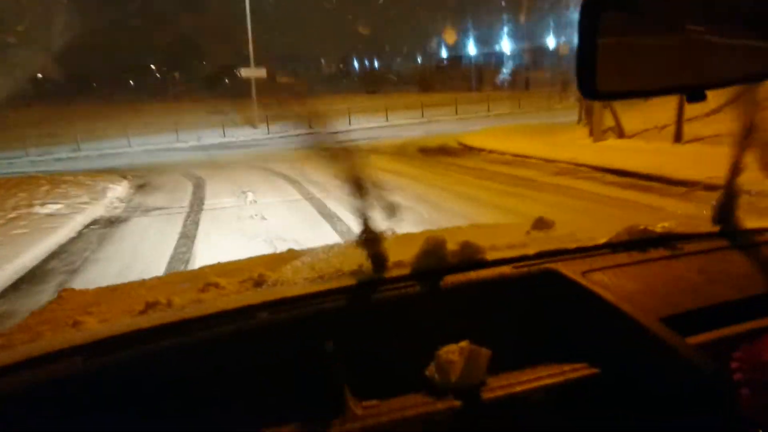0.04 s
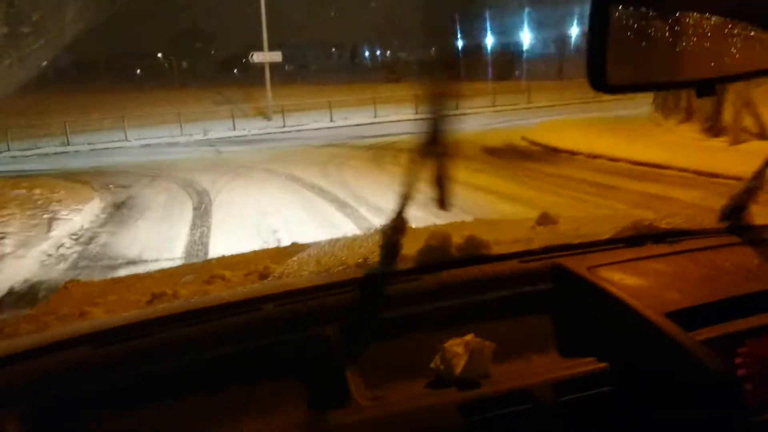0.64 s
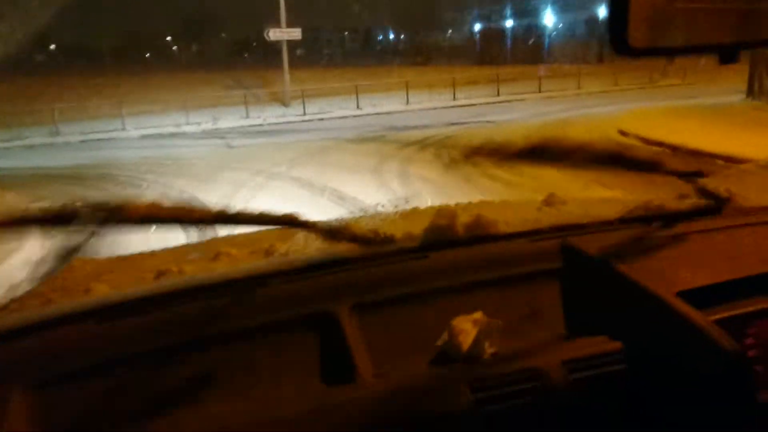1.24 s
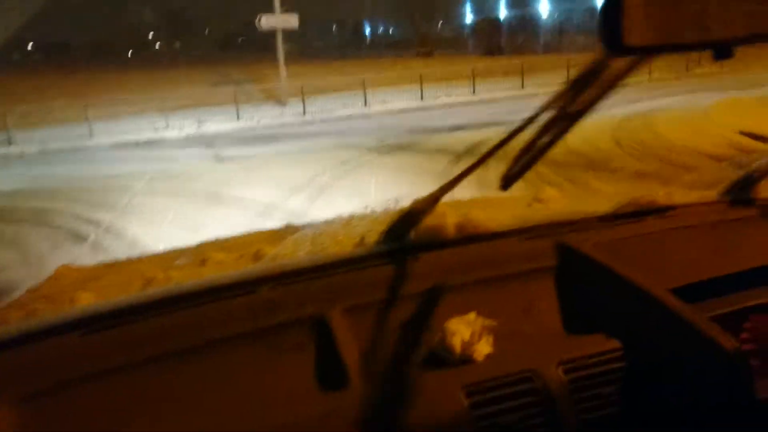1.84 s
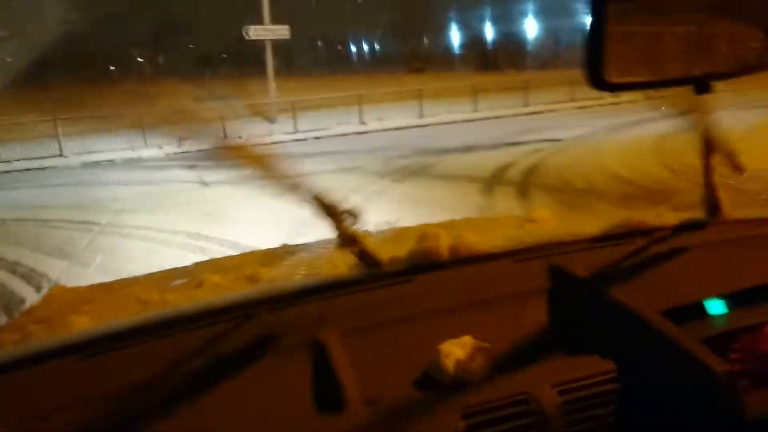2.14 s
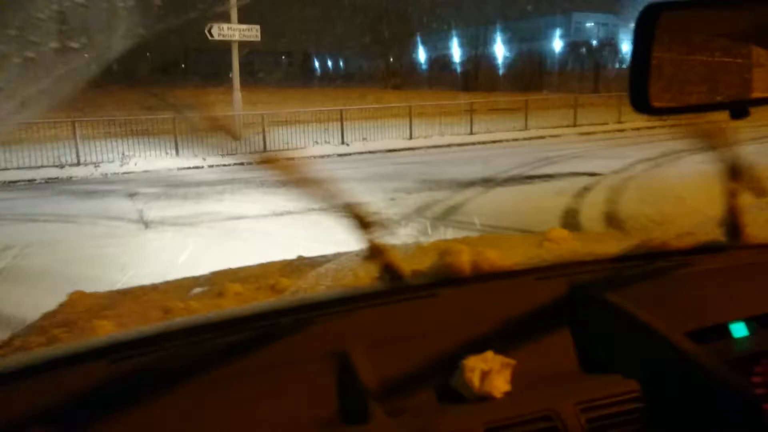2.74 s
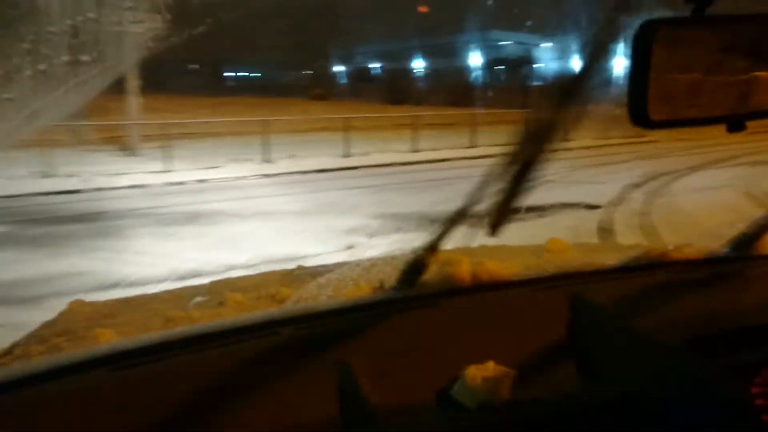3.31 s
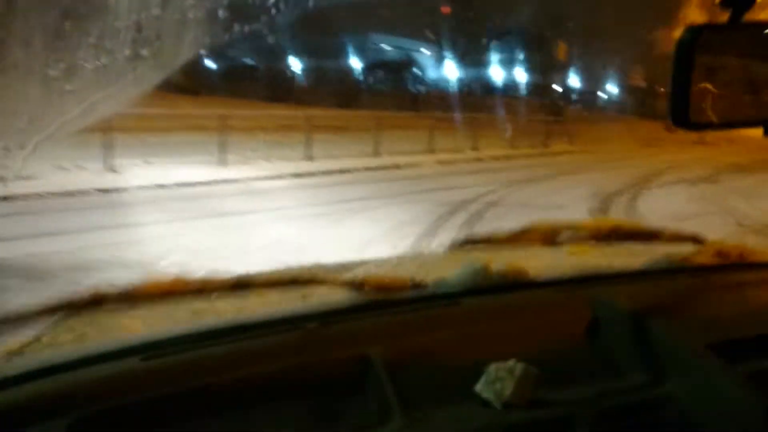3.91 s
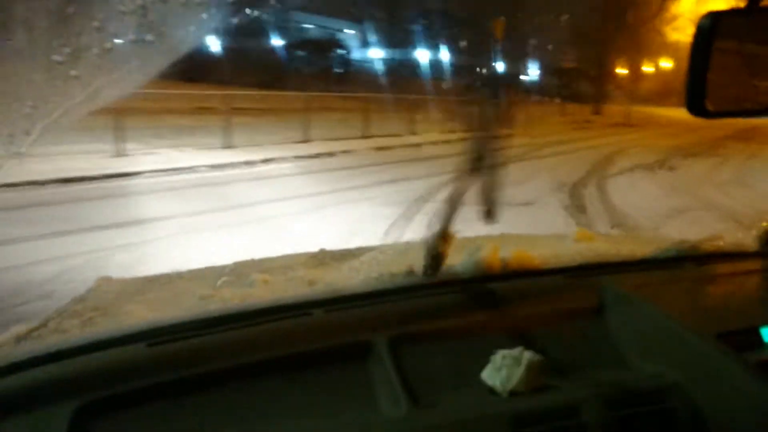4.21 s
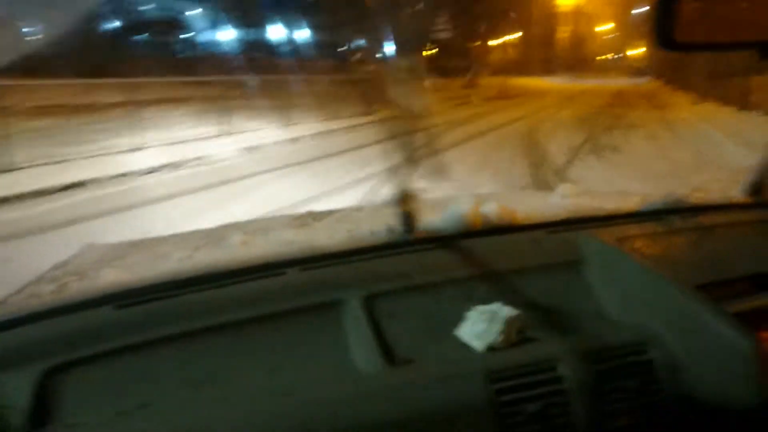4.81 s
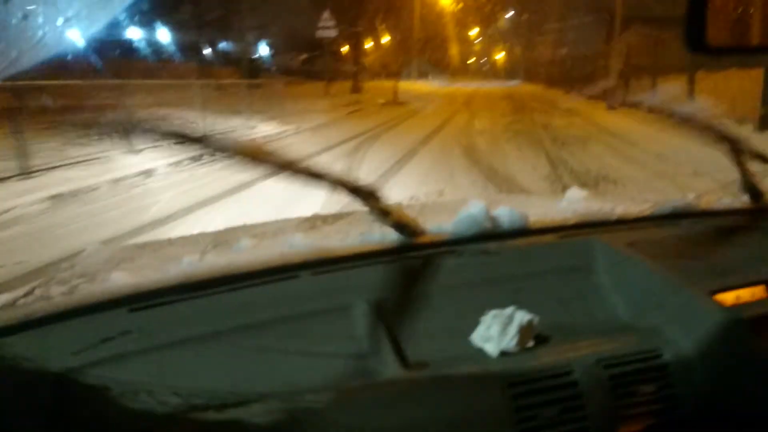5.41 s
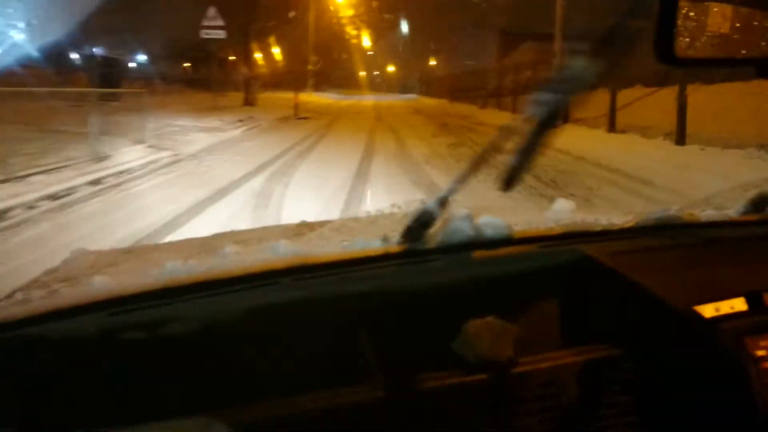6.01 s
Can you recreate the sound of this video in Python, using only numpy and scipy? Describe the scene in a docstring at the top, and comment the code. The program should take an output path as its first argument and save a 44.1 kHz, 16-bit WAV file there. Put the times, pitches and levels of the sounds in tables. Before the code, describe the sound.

A low engine booms inside a small car turning slowly on snow, with tyre rumble, soft thuds, a heater fan and plastic clicks.

```python
"""A low engine boom fills a small car as it turns slowly through a snowy junction and pulls away.
Firing harmonics swell in the cabin's resonances; tyres rumble, thud and roar over packed snow.
The heater fan blows steadily through ringing ducts. The steering wheel hisses through the hands,
and plastic parts around the column click."""
import sys
import numpy as np
from scipy import signal
from scipy.fft import rfft, irfft, next_fast_len
from scipy.io import wavfile
from scipy.ndimage import uniform_filter1d

SR = 44100
rng = np.random.default_rng(int(sys.argv[2]) if len(sys.argv) > 2 else 0)


def materialize(psi):
    """Save the field psi as 16-bit PCM at rate SR to the path in sys.argv[1].

    A 1-D psi becomes a single channel; in a 2-D psi each row is a channel.
    """
    bounded = np.clip(np.atleast_2d(psi).T, -1, 1)
    quanta = np.round(bounded * 32767).astype(np.int16)
    wavfile.write(sys.argv[1], SR, quanta)


N = 271215
TIME_S = np.arange(N) / SR
FFT_SIZE = next_fast_len(N + 2, True)
BIN_HZ = np.maximum(np.arange(FFT_SIZE // 2 + 1) * SR / FFT_SIZE, 1)

# tyre noise, louder with road speed: time_s, level_db
TYRE_LEVEL = [(0, -34), (1.25, -35), (2.2, -37), (2.7, -37), (3.3, -34.5), (4.1, -34.5), (6.15, -34)]


def engine(wander_per_db=0.002, rough_hz=12, throb=0.6):
    """Four firing harmonics pass the bulkhead and boom in the cabin; the exhaust puffs once a firing."""
    # revs, sinking in the turn: time_s, firing_hz
    firing = [(0, 54), (.7, 51.6), (1.3, 48.5), (1.7, 45.2), (2.15, 42.7), (2.6, 41), (3.1, 42.6),
              (3.5, 45.5), (4.2, 47.5), (4.8, 50.8), (5.3, 53.3), (6.15, 56.3)]
    # firing strength: time_s, level_db
    effort = [(0, -7.5), (.5, -4.5), (.9, -0.5), (1.25, -4.5), (1.6, -5.5), (1.85, -2), (2.15, 1),
              (2.5, -2.5), (2.8, -10), (3.1, 1), (3.4, -5), (3.95, -9.5), (4.45, -1), (4.85, -2.5),
              (5.2, -6), (5.6, -3.5), (6.15, 4)]
    # load hardens and roughens the firing: time_s, overtone_db, shake_db
    load = [(0, -6, 0.7), (1.2, -1.5, 1), (2.1, 3, 0.2), (3.3, -4, 1), (4.4, 2.5, 2), (5.5, 4.5, 1.5),
            (6.15, 1.5, 0.5)]
    # cabin resonances: centre_hz, width_hz, level_db
    cabin_modes = [(41.7, 5.4, -33.5), (52.5, 6.5, -27), (94.3, 6, -33), (109.8, 19.7, -33.5),
                   (116, 3.5, -31.5), (131.4, 17, -34), (146, 29, -46), (176.8, 13, -42.5)]
    # exhaust growl, rising out of the turn: time_s, level_db
    growl_level = [(0, -68), (2.8, -67), (3.5, -53.5), (4.3, -54), (5, -51), (5.65, -48.5), (6.15, -52)]
    # exhaust spectrum: freq_hz, gain_db
    exhaust = [(36, -24.5), (56, -1), (74, -0.5), (94, 1), (112, -10.5), (135, -8.5), (175, -18),
               (230, -38), (600, -76)]
    firing_hz, = in_time(firing)
    effort_db, = in_time(effort)
    overtone_db, shake_db = in_time(load)
    growl_db, = in_time(growl_level)
    phase = running_phase(firing_hz * (1 + wander_per_db * shake_db * drift(rough_hz)))
    harmonics = np.zeros(N)
    for k in range(1, 5):
        boom_power = sum((from_db(level_db) * resonance(k * firing_hz, centre_hz, width_hz)) ** 2
                         for centre_hz, width_hz, level_db in cabin_modes)
        drive = from_db(effort_db + (k > 1) * overtone_db + shake_db * drift(rough_hz))
        harmonics += np.sqrt(boom_power) * drive * np.sin(k * phase + 2 * np.pi * rng.random())
    puffs = to_sound(white_spectrum()) * (1 + throb * np.cos(phase)) / np.sqrt(1 + throb ** 2 / 2)
    return np.sqrt(2) * harmonics + from_db(growl_db) * equalise(puffs, exhaust)


def tyre_rumble(trim_db=-2.0, levelling=0.37, window_s=0.04):
    """Tyres rumble through the floor, swelling over rough snow."""
    # floor spectrum: freq_hz, level_db
    floor = [(20, -59), (32, -32.5), (45, -14.5), (58, -14), (78, -20.5), (97, -12.5), (135, -17.5),
             (180, -20), (225, -33), (300, -40), (480, -51), (1000, -91.5)]
    # rough snow: centre_s, half_length_s, rise_db
    patches = [(0.085, 0.053, 5), (0.422, 0.043, 5), (0.902, 0.044, 9.5), (1.048, 0.027, 6),
               (1.483, 0.052, 5.5), (4.89, 0.2, 1.5), (5.619, 0.13, 0.5)]
    road_db, = in_time(TYRE_LEVEL)
    swell_db = sum(rise_db * np.exp(-((TIME_S - centre_s) / half_s) ** 2)
                   for centre_s, half_s, rise_db in patches)
    rumble = cabin_noise(floor)
    power = uniform_filter1d(rumble[0] ** 2, int(window_s * SR))
    steadying = (power.mean() / power) ** (levelling / 2)
    return from_db(road_db + swell_db + trim_db) * rumble * steadying


def jolts(rise_s=0.0079, spread_octaves=0.58):
    """Springs soften each rut into a push that rings the body modes nearest in pitch."""
    # ruts, sharper edges pushing higher: start_s, level_db, push_hz
    ruts = [(0.878, -8.5, 112), (.886, -10, 160), (0.904, -14, 170), (.972, -8.5, 115), (1.036, -19.5, 170),
            (1.375, -11.5, 58), (1.469, -15.5, 120), (1.488, -9.5, 62), (3.935, -10, 110),
            (4.515, -7.5, 53), (5.612, -5.5, 70.4)]
    # car body modes: pitch_hz, gain_db, t60_s
    body_modes = [(59.7, -2.5, .14), (102.7, -1.5, 0.083), (135, -0.5, 0.097), (181.3, -3.5, 0.19),
                  (255, -10.5, 0.067)]
    out = np.zeros(N + SR)
    age_s = TIME_S[:SR // 2]
    for start_s, level_db, push_hz in ruts:
        at = int(start_s * SR)
        for pitch_hz, gain_db, t60_s in body_modes:
            share = np.exp(-(np.log2(pitch_hz / push_hz) / spread_octaves) ** 2)
            swing = rise_and_decay(age_s, rise_s, t60_s) * np.sin(2 * np.pi * pitch_hz * age_s)
            out[at:at + len(age_s)] += share * from_db(level_db + gain_db) * swing
    return out[:N]


def heater_fan(air_db=-0.24, flutter_db=0.4, hum_waver_db=0.9, whine_waver_db=3.5):
    """Air rushes through resonant ducts over the motor's hum and wavering commutator whine."""
    # fan air: freq_hz, left_db, right_db
    air_spectrum = [(103, -73.5, -80.5), (283.5, -65.5, -66), (378, -80, -69), (520, -83.5, -82),
                    (960, -86.5, -82.5), (1270, -82.5, -75), (1430, -83.5, -80.5), (2285, -88, -83),
                    (3550, -85.5, -97), (4880, -90, -96.5), (5300, -99, -100), (6560, -99, -103.5),
                    (9700, -108, -104), (12500, -132, -122)]
    # duct and cabin resonances: centre_hz, width_hz, level_db, pan_db, right_lag_rad
    duct_modes = [(387, 46, -74, -4, 0.5), (595.7, 57, -71.5, 7, 0.61), (710, 36, -78.5, 4, .4),
                  (801, 71, -73.5, 2, 0.0056), (850.4, 41, -72.5, 2.5, 0.17), (976, 33, -73.5, 11, 2.7),
                  (1072, 90, -73, 0.5, 0.051), (1350.7, 34, -73, 6.5, 1.88), (2106, 120, -89, -20, 0.17),
                  (4570, 470, -93, 9, 2.8), (6340, 1500, -102, 1, 0.67)]
    # motor speed: time_s, turns_per_s
    rotor = [(0, 53.5), (2.0, 53.5), (4.6, 54.25), (6.15, 54.5)]
    # motor tones: cycles_per_turn
    orders = (5, 10, 11, 36, 48, 60, 64, 72, 83)
    # strength of each motor tone: level_db, pan_db
    tone_levels = [(-53, 1), (-70.5, 20), (-68, 8.5), (-75.5, 1.5), (-70.5, 3), (-73, 8.5), (-75, 12.5),
                   (-86, -8.5), (-74, 12.5)]
    ducts = 0
    for centre_hz, width_hz, level_db, pan_db, right_lag_rad in duct_modes:
        band = white_spectrum() * resonance(BIN_HZ, centre_hz, width_hz) * from_db(level_db)
        ducts += band * pan(pan_db) * np.exp([[0], [-1j * right_lag_rad]])
    air = (cabin_noise(air_spectrum) + to_sound(ducts)) * from_db(air_db + flutter_db * drift(rate_hz=14))
    turns_per_s, = in_time(rotor)
    phase = running_phase(turns_per_s * (1 + 0.0009 * drift(rate_hz=10)))
    motor = 0
    for order, (level_db, pan_db) in zip(orders, tone_levels):
        waver_db = np.interp(order, [orders[0], orders[-1]], [hum_waver_db, whine_waver_db])
        motor += pan(pan_db) * from_db(level_db + waver_db * drift(rate_hz=3)) * np.sin(order * phase)
    return air + np.sqrt(2) * motor


def tread(width_hz=150, lumpy_db=0.6, lumps_hz=7):
    """The tread roars in a broad resonance and crushes snow unevenly."""
    # roar, fading in the turn and returning lower: time_s, level_db, centre_hz
    roar_band = [(0, -75.5, 1034), (1.4, -74, 1056), (2.1, -74, 1052), (2.8, -81, 1021), (3.8, -79.5, 980),
                 (4.3, -79, 970), (4.85, -74, 970), (5.22, -83, 960), (5.5, -73, 980), (6.15, -77, 980)]
    # crushed snow: freq_hz, level_db
    crush_spectrum = [(200, -64), (400, -47), (600, -43), (850, -50), (1300, -58), (3000, -89.5)]
    roar_db, centre_hz = in_time(roar_band)
    road_db, = in_time(TYRE_LEVEL)
    phase = running_phase(centre_hz)
    lowpass = 1 / np.sqrt(1 + (2 * BIN_HZ / width_hz) ** 4)
    in_phase, quadrature = (to_sound(white_spectrum() * lowpass) for _ in range(2))
    roar = from_db(roar_db) * np.sqrt(2) * (in_phase * np.cos(phase) + quadrature * np.sin(phase))
    crush = from_db(road_db) * cabin_noise(crush_spectrum)
    return (roar + crush) * from_db(lumpy_db * drift(lumps_hz))


def plastic_clicks(trim_db=-2.0, rise_s=0.0011, crack_hz=6000, split_hz=100, overtone_ratio=2.8):
    """Each snap cracks, rings two close modes and an overtone, and scatters off glass and dashboard."""
    # plastic snaps: start_s, level_db, pitch_hz, ring_db, crack_db, t60_s, pan_db
    snaps = [ (0.075, -36, 2980, -21, -3, 0.045, 0), (0.719, -37.5, 2600, -10, -25, 0.062, 3),
             (1.361, -36, 2570, -29, -3, 0.042, -1), (1.386, -31.5, 2000, -12, -18, 0.063, 7),
             (1.5822, -24.5, 2586, -5.5, 3.5, 0.037, 1.5), (1.587, -37, 2570, -8, 2, .035, 9),
             (1.899, -35.5, 3050, -22, -4, 0.073, 5), (2.002, -33.5, 2920, -20, -20, 0.089, 2),
             (2.581, -37, 3290, -12, -17, .08, 5), (2.642, -38.5, 2640, -14, -9, 0.13, 3),
             (2.694, -36.5, 2640, -16, -11, 0.052, 9), (3, -33, 2850, -29, 5, 0.055, 5),
             (3.3263, -24.5, 2580, -11, 10, 0.055, 3.5), (3.63, -33.5, 3360, -30, -2, 0.072, 2),
             (3.8923, -26, 4140, -4.5, 8, 0.041, 5), (3.9068, -23.5, 4600, -3, -2, 0.027, 4),
             (3.909, -21.5, 3320, -7, -6, 0.015, 3), (3.9136, -26, 3750, -14, 2, 0.048, 1),
             (3.939, -35, 3240, -7, -6, 0.062, 7), (3.956, -38, 3570, -13, -7, 0.081, 4),
             (3.995, -42, 3250, -9, -14, 0.046, 7)]
    # snap spectrum: freq_hz, gain_db
    snap_spectrum = [(400, -29), (1500, -2.5), (2000, 0.5), (2650, 4.5), (3600, 4.5), (4550, -0.5),
                     (5350, -4.5), (6450, -2.5), (8400, -13), (10300, -14), (14000, -27.5)]
    age_s = TIME_S[:SR // 5]
    out = np.zeros((2, FFT_SIZE))
    for start_s, level_db, pitch_hz, ring_db, crack_db, t60_s, pan_db in snaps:
        scatter, crack_noise = rng.standard_normal((2, 2, len(age_s)))
        crack = butterworth(crack_noise, 2, crack_hz, "high")
        modes = sum(np.sin(2 * np.pi * mode_hz * age_s + np.pi / 2 * rng.random((2, 1)))
                    for mode_hz in (pitch_hz - split_hz / 2, pitch_hz + split_hz / 2))
        overtone = from_db(-8) * np.sin(2 * np.pi * overtone_ratio * pitch_hz * age_s)
        ring = modes / np.sqrt(2) + overtone
        snap = scatter + from_db(ring_db) * ring + from_db(crack_db) * crack
        envelope = from_db(level_db + trim_db) * rise_and_decay(age_s, rise_s, t60_s)
        at = int(start_s * SR)
        out[:, at:at + len(age_s)] += pan(pan_db) * envelope * snap
    return equalise(out, snap_spectrum)


def steering_rub(attack_s=0.019, sag_db_per_s=12, release_s=0.06, resting_db=-20.5, grain_db=0.5):
    """Skin catches and slips on the rim: a grainy hiss in strokes, faint under resting hands."""
    # slides, each fading as the wheel slows: start_s, length_s, level_db
    strokes = [(0, .3, -7), (1.103, 0.1, -5), (1.513, 0.97, 2.5), (2.047, 0.027, 2.5), (2.33, 0.24, 6),
               (2.616, 0.39, 0), (2.935, 0.41, 2.5), (3.895, 0.2, 1), (5.083, 0.065, -0.5),
               (5.47, 0.047, 1)]
    # rim hiss: freq_hz, level_db
    hiss_spectrum = [(600, -110), (1600, -93), (2800, -94), (4500, -95), (7000, -100), (10000, -103.5),
                     (14000, -114)]
    power = from_db(resting_db) ** 2
    for start_s, length_s, level_db in strokes:
        age_s = np.maximum(TIME_S - start_s, 0)
        attack = np.minimum(age_s / attack_s, 1)
        release = np.exp(-np.maximum(age_s - length_s, 0) / release_s)
        power += (attack * release * from_db(level_db - sag_db_per_s * age_s)) ** 2
    hiss = cabin_noise(hiss_spectrum) * np.sqrt(power)
    return pan(0.5) * hiss * from_db(grain_db * drift(rate_hz=90))


def cabin_noise(spectrum):
    """Stereo noise: long waves reach both sides alike, short ones do not."""
    # left-right likeness in the cabin: freq_hz, correlation
    likeness = [(50, 0.97), (170, 1), (260, 0.73), (400, 0.48), (800, 0.59), (1250, 0.52), (1500, -0.64),
                (1900, -0.34), (2300, 0.62), (3200, -0.36), (14000, 0.38)]
    correlation = np.clip(over_hz(likeness), -1, 1)
    mid = np.sqrt((1 + correlation) / 2) * white_spectrum()
    side = np.sqrt((1 - correlation) / 2) * white_spectrum()
    return to_sound(from_db(over_hz(spectrum)) * (mid + side * [[1], [-1]]))


def from_db(db):
    return 10 ** (np.asarray(db) / 20)


def pan(pan_db):
    """Stereo gains; pan_db is left minus right."""
    return from_db(np.array([[0.5], [-0.5]]) * pan_db)


def in_time(rows):
    """Curve columns, one value per sample."""
    time_s, *columns = np.transpose(rows)
    return [np.interp(TIME_S, time_s, column) for column in columns]


def over_hz(rows):
    """Spectrum columns, one value per bin."""
    freq_hz, *columns = np.transpose(rows)
    return np.array([np.interp(np.log(BIN_HZ), np.log(freq_hz), column) for column in columns])


def white_spectrum():
    """Fresh noise, unit power per Hz."""
    return rfft(rng.standard_normal(FFT_SIZE)) * np.sqrt(SR / 2)


def to_sound(spectrum):
    return irfft(spectrum, FFT_SIZE)[..., :N]


def equalise(sound, gains):
    return to_sound(rfft(sound, FFT_SIZE) * from_db(over_hz(gains)))


def drift(rate_hz):
    """Smooth random motion, unit spread."""
    slow = to_sound(white_spectrum() / (1 + (BIN_HZ / rate_hz) ** 2) ** 2)
    return slow / slow.std()


def running_phase(freq_hz):
    return 2 * np.pi * np.cumsum(freq_hz) / SR


def resonance(freq_hz, centre_hz, width_hz):
    return 1 / (1 + (2 * (freq_hz - centre_hz) / width_hz) ** 2)


def rise_and_decay(age_s, rise_s, t60_s):
    return (1 - np.exp(-age_s / rise_s)) * np.exp(-np.log(1000) * age_s / t60_s)


def butterworth(sound, order, edge_hz, kind):
    return signal.sosfilt(signal.butter(order, edge_hz, kind, fs=SR, output="sos"), sound)


def scene():
    """The body carries the bass; tread, fan, steering and clicks are heard directly."""
    bass = pan(-1.6) * (engine() + tyre_rumble() + jolts())
    return bass + tread() + heater_fan() + steering_rub() + plastic_clicks()


def record(dry, bass_cut_hz=32, dip_hz=11500, dip_width_hz=2200, left_top_hz=9500,
           port_band_hz=(12350, 13250), port_db=8.0, top_hz=14000):
    """The microphone loses deep bass and dips in the treble; its left port is dull, its right rings."""
    heard = butterworth(dry, 6, bass_cut_hz, "high")
    left, right = signal.lfilter(*signal.iirnotch(dip_hz, dip_hz / dip_width_hz, fs=SR), heard)
    left = butterworth(left, 4, left_top_hz, "low")
    right = right + from_db(port_db) * butterworth(right, 2, port_band_hz, "band")
    return signal.sosfilt(signal.ellip(10, 0.1, 90, top_hz, fs=SR, output="sos"), [left, right])


dry = scene()
out = record(dry)
materialize(out)
```